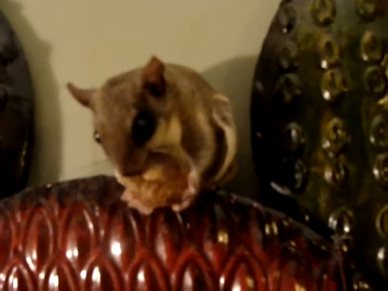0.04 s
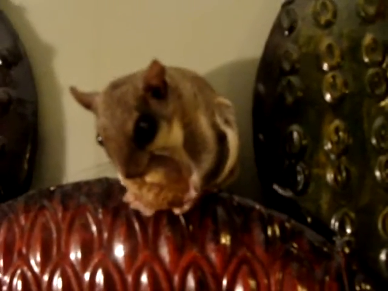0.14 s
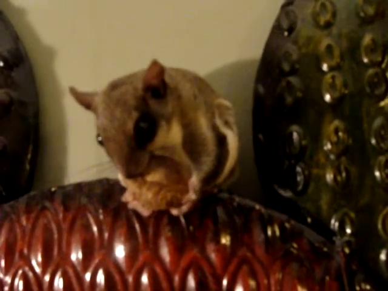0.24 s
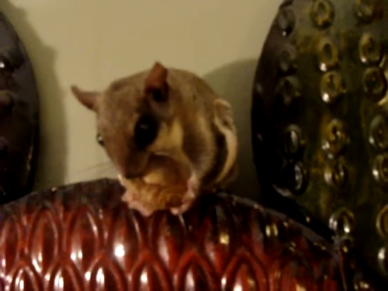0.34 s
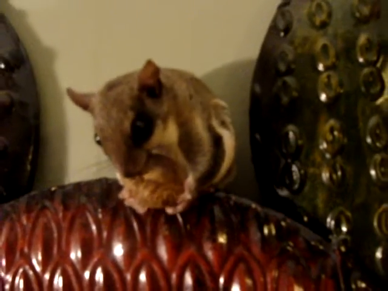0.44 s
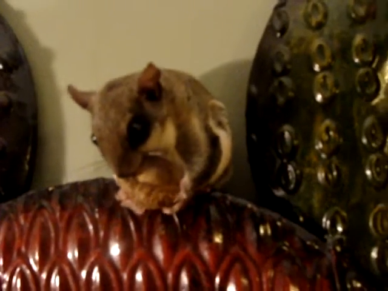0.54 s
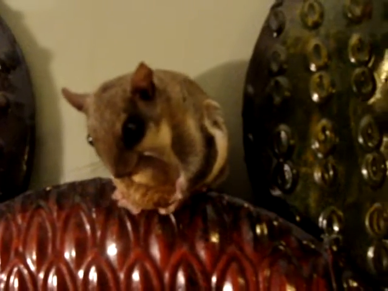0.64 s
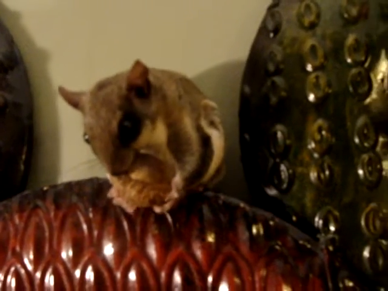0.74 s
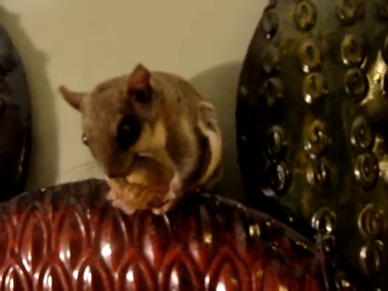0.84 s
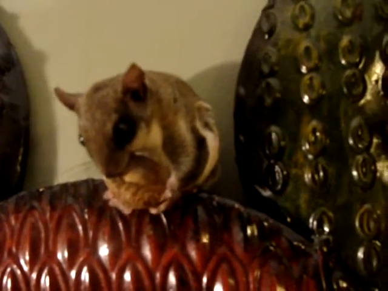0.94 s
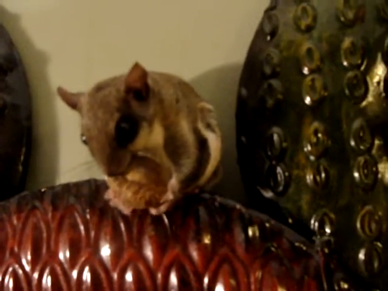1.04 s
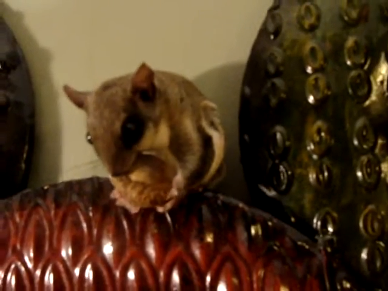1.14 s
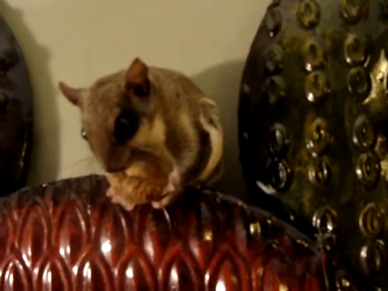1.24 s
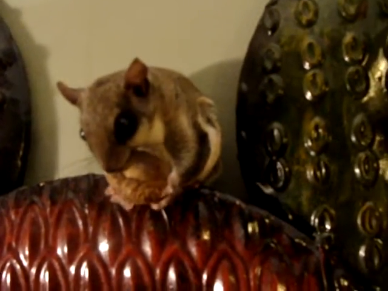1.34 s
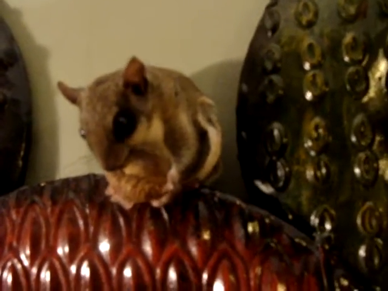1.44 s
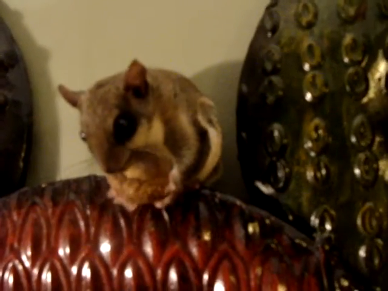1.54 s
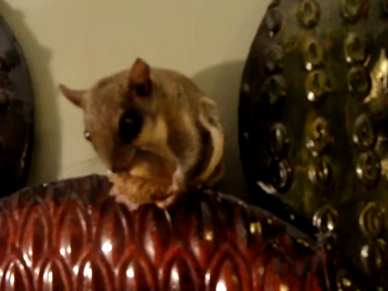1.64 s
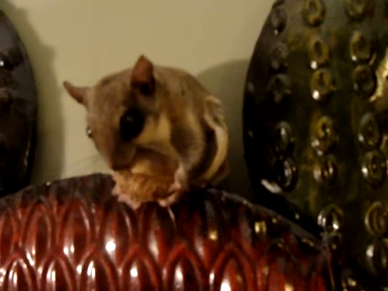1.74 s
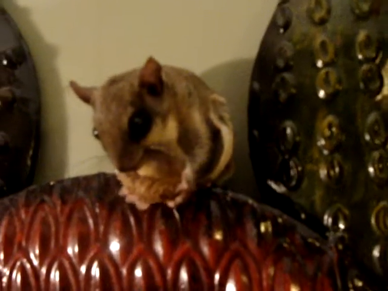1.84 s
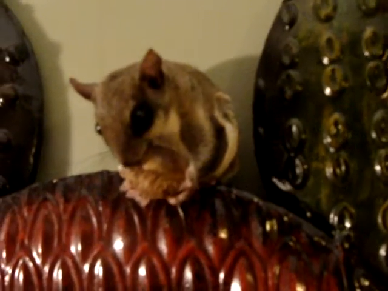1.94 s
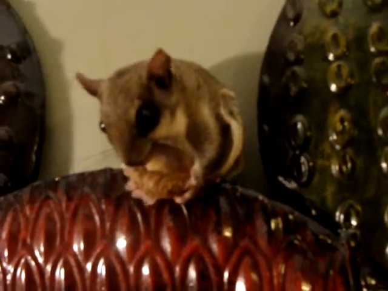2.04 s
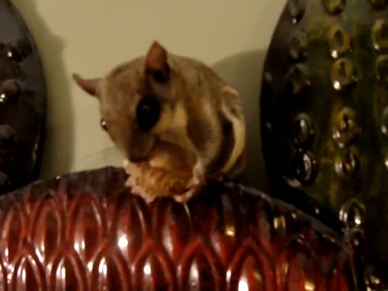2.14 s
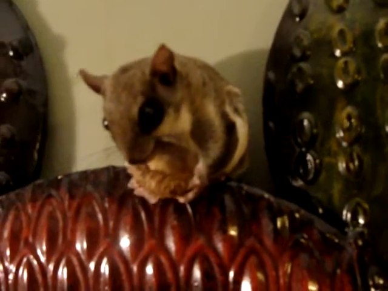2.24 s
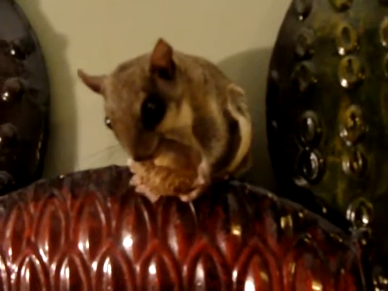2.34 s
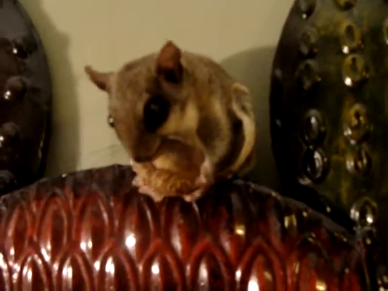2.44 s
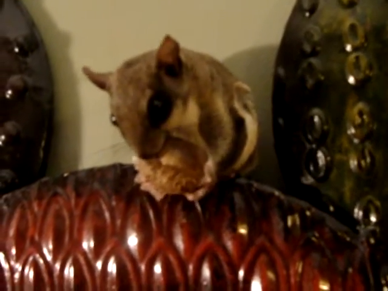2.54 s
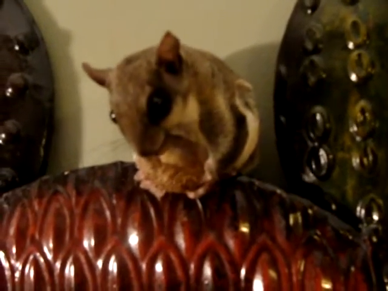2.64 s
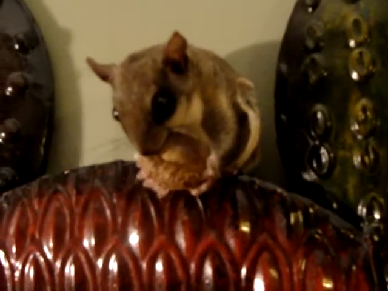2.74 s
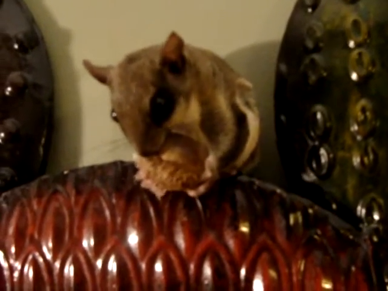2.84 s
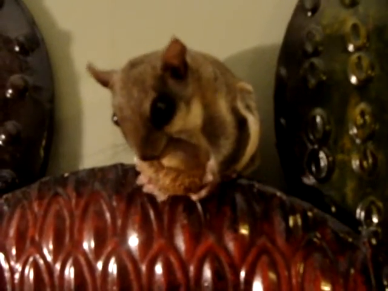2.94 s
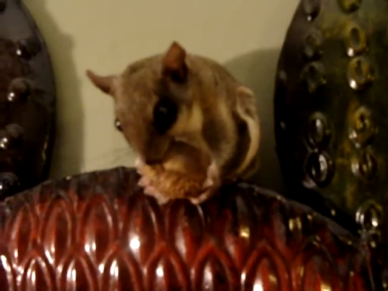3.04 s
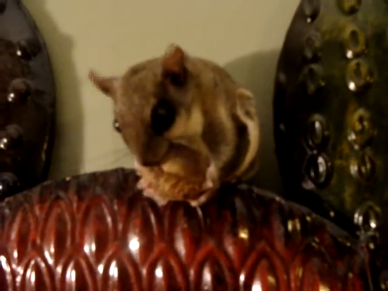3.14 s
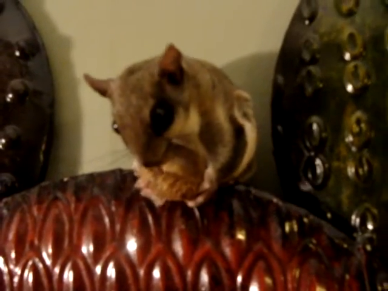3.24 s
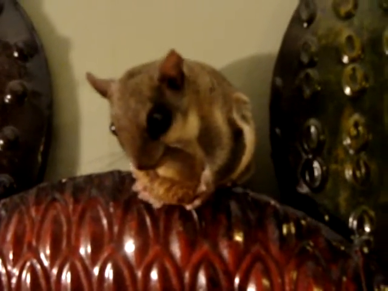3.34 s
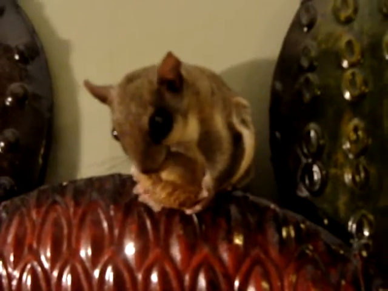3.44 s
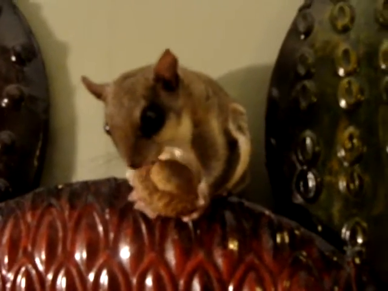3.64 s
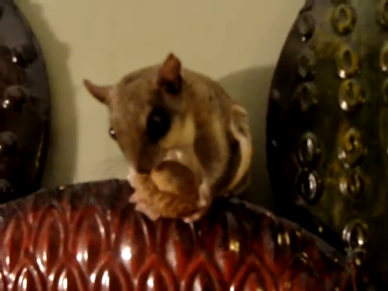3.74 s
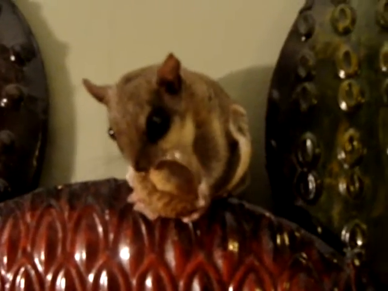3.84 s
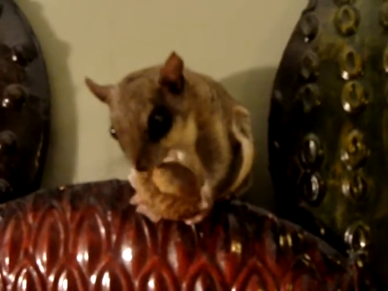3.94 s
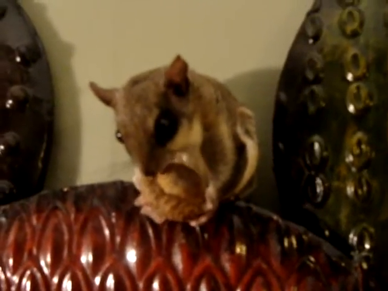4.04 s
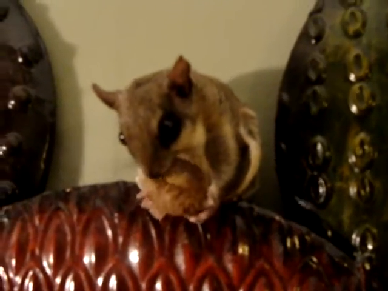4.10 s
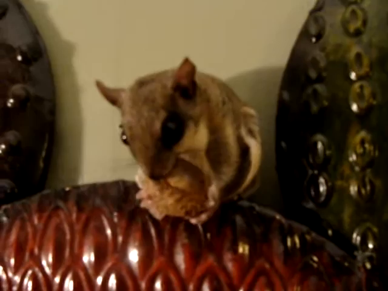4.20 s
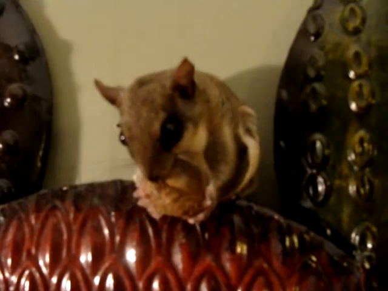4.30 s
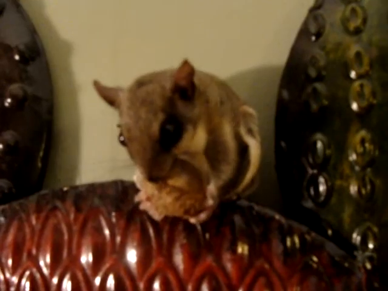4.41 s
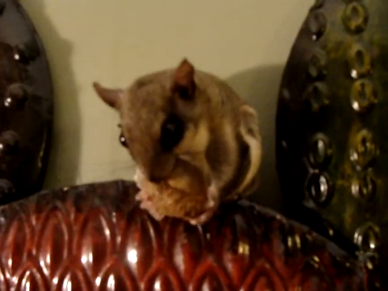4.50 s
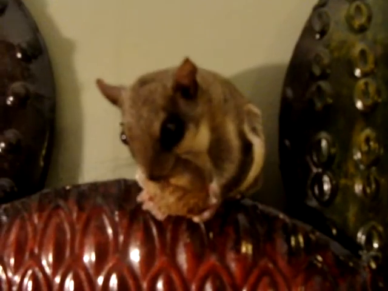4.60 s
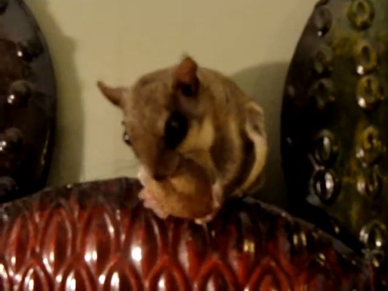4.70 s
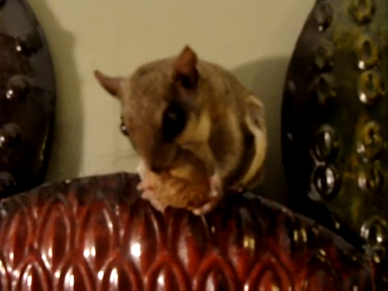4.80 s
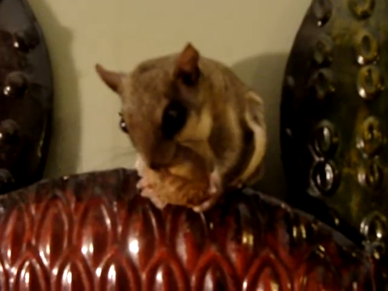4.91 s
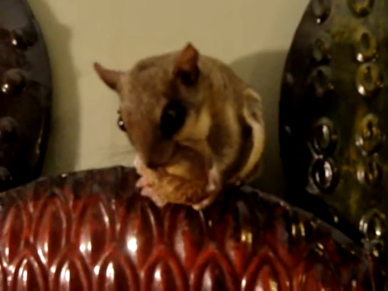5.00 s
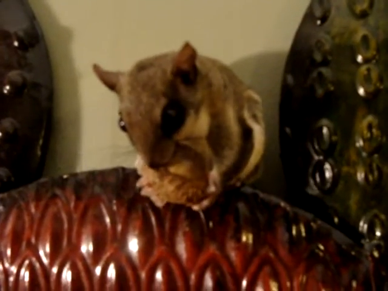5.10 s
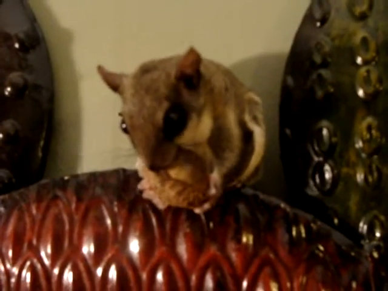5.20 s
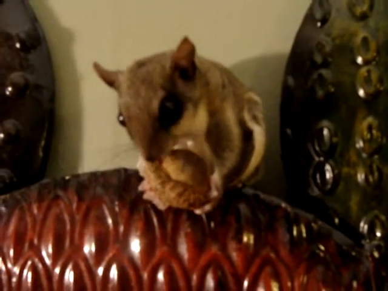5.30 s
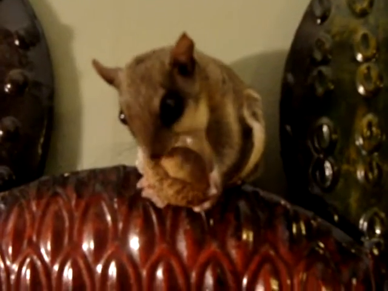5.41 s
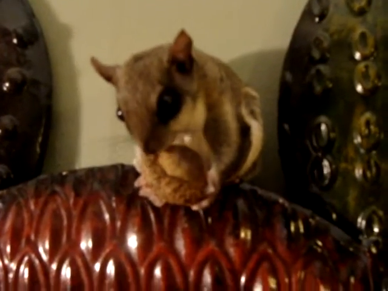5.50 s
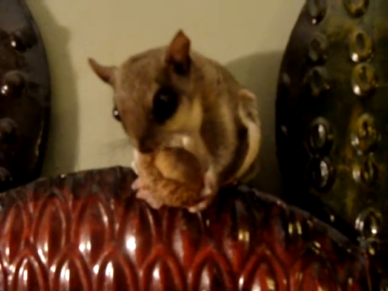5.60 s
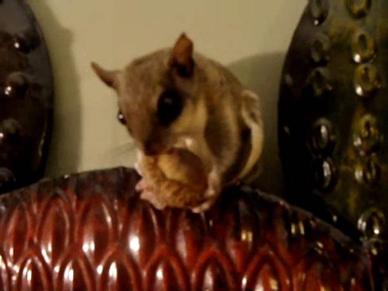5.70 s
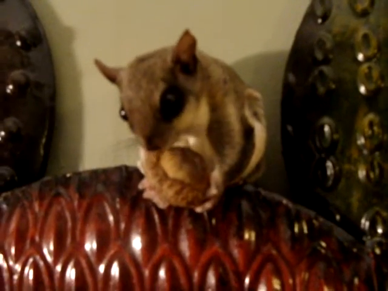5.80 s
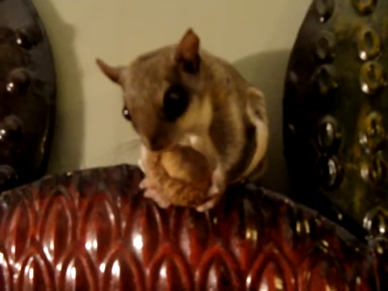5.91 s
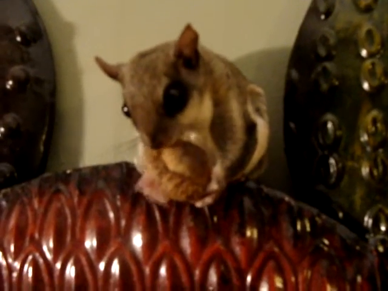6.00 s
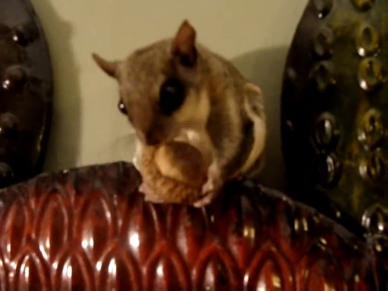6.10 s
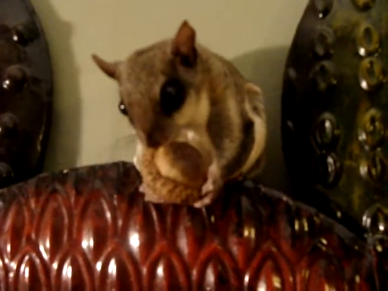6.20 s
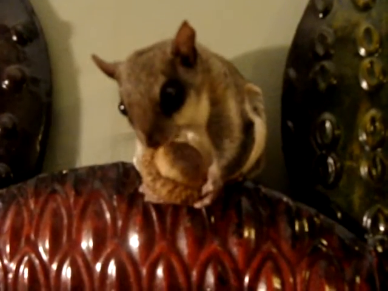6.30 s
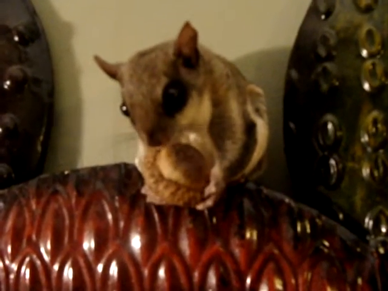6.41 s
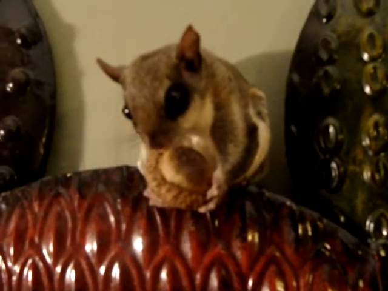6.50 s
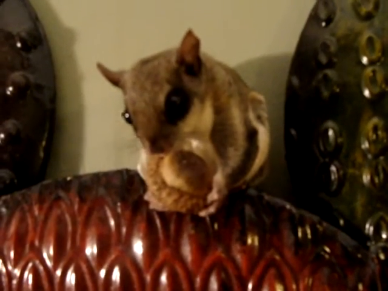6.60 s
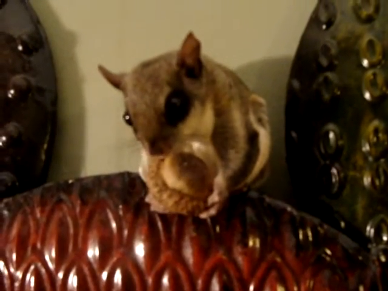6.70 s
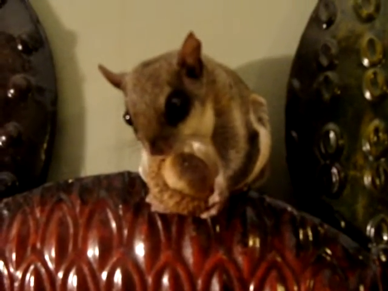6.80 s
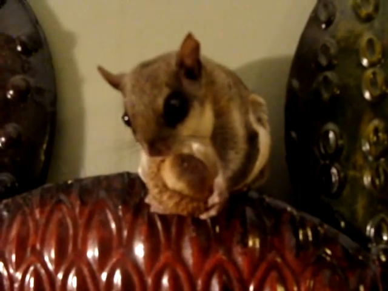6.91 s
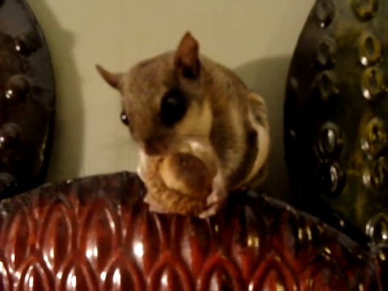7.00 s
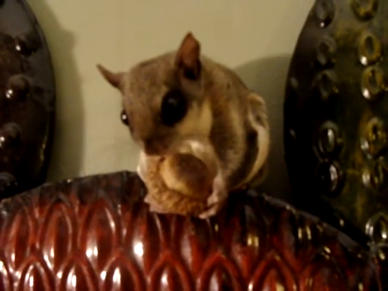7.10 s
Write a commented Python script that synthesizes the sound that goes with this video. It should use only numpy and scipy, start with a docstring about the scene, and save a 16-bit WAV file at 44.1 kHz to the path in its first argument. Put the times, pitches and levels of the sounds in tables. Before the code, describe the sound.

A small rodent gnaws a hard nut close to a small microphone in a quiet room. Sharp, brittle cracks begin at once, strong in the first 0.4 seconds with a slight low thump under two of them. Until about 3.5 seconds the clicks keep coming several a second, unevenly, some single and some in tight pairs, with a hollow woody ring and bright snap; a particularly hard one falls near 2.3. Tiny stuttering tooth scrapes and fine crackle fill in between. From 3.5 to 4.2 there is a pause, then a few weaker bites, with firmer cracks around 4.7 to 5.05. At 5.15 to 5.6 the last small cracks mix with soft knocks and rasps as the nut is turned; one faint rub comes at 6.2. Otherwise only low room drone, faint hum and gently pulsing hiss remain until about 7 seconds. Reverberation is slight.

```python
"""A flying squirrel's teeth crack an acorn on a glazed pot, close to a small microphone in a quiet room:
each crack is a run of breaks exciting the resonances of the hollow nut and its stiff shell.
Dragging teeth stick and slip in tiny fractures; random impulses crackle faintly around cracks and drags.
Near the end it stops and shifts the nut, with filtered-noise rubs that knock and rasp.
Echoes and a faint tail follow; beneath lie shaped-noise room drone and hiss, with sine hum."""
import sys
import numpy as np
from scipy import signal
from scipy.fft import rfft, irfft
from scipy.io import wavfile

SR = 44100
rng = np.random.default_rng(int(sys.argv[2]) if len(sys.argv) > 2 else 0)


def generate_wav(sig):
    """Save sig (samples, or channels by samples) to the path in sys.argv[1] as 16-bit PCM at SR."""
    pcm = np.round(np.clip(np.atleast_2d(sig).T, -1, 1) * 32767).astype(np.int16)
    wavfile.write(sys.argv[1], SR, pcm)


N = 315297

# Room air with microphone hiss, relative spectrum: f/Hz, density/dB (per Hz)
AIR_SPECTRUM = [(20, -16.5), (45, -11.5), (72, -9.5), (95, 3), (140, -2.5), (240, -4.5), (345, -0.5),
                (460, -6), (900, -9), (1800, -14), (2400, -15), (3400, -21), (7000, -26), (10000, -29.5)]
AIR_DB = -49.5  # rms
# Mains hum, steady sines: f/Hz, rms level/dB
HUM_TONES = [(59, -66), (240, -65)]
# Periodic faint swelling of the hiss: first peak t/s, period/s, Gaussian half-width/s (to 1/e)
HISS_SWELL = (.06, 1.0, .035)
# Reflections from nearby pots and wall: delay/s, level/dB
REFLECTIONS = [(.0024, -35), (.0043, -30), (.0091, -47)]
# Reverberation time of the room: f/Hz, t60/s
REVERBERATION = [(500, 1), (2500, 1), (5000, 0.41), (10000, 0.66)]
# Low push under two hard cracks: t/s, peak level before filtering/dB, decay constant/s
LOW_PUSHES = [(0.048, -30, 0.0022), (0.3745, -34.5, 0.0084)]
# The nut shifts in the paws: t/s, length scale/s, knock level/dB, rasp level/dB, rasp f/Hz
NUT_SHIFTS = [(5.184, 0.02, -56, -50, 2300), (5.215, 0.018, -44, -50, 2300), (5.226, 0.028, -50, -46, 2200),
              (5.242, .014, -60, -47.5, 2720), (5.426, 0.012, -38, -44, 2600),
              (5.591, 0.021, -55, -50, 1740), (6.224, 0.01, -66, -48.5, 2700)]
# Teeth drag over the shell: start t/s, length/s, rms level before the overall drag gain/dB
TOOTH_DRAGS = [(0.188, 0.012, -44), (0.29, 0.04, -45.5), (0.484, 0.042, -46.5), (0.551, 0.0077, -47),
               (0.669, 0.016, -43), (0.796, 0.0095, -50), (0.827, 0.019, -41), (0.959, 0.029, -48.5),
               (1.119, 0.021, -44.5), (1.5, 0.015, -43.5), (1.636, 0.048, -48.5), (1.812, 0.0062, -46.5),
               (2.274, 0.009, -37), (2.366, 0.007, -47.5), (2.573, 0.012, -40.0), (2.6, 0.006, -51),
               (2.707, 0.026, -50.5), (2.757, 0.011, -44), (2.902, 0.024, -48), (3.048, 0.0084, -44.5),
               (3.104, 0.011, -44.0), (3.259, 0.027, -45.5), (3.46, 0.011, -46.0), (3.521, 0.0063, -47),
               (4.145, 0.016, -47.5), (4.719, 0.0065, -37.5), (4.892, 0.01, -45), (5.042, 0.006, -37),
               (5.192, 0.0084, -43)]
# The shell gives way: t/s, energy level before the overall gnawing gain/dB,
# hollow ring over shell crack and snap together/dB, ring f/Hz, nominal shell f/Hz,
# energy ratio of each after-crack to the one before (0-1, limited in use)
SHELL_CRACKS = [(0.0108, -35.5, 2, 2950, 4320, 0.15), (0.0437, -20.5, 0, 2920, 4850, 0.3),
                (0.0485, -20, -5.5, 2530, 5200, 0.57), (0.161, -25, 1, 2530, 4530, 0.84),
                (0.1984, -23.5, -4, 2440, 5360, 0.7), (0.331, -36, 1.5, 2160, 5550, 0.1),
                (0.3754, -21, -5, 2510, 4890, 0.1), (0.5048, -34.5, 6, 2400, 3530, 0.1),
                (0.5155, -32.5, -1, 2270, 5180, 0.1), (0.5607, -26.5, -6, 2640, 5100, 0),
                (0.651, -29.1, 1, 2470, 4200, 0.06), (0.672, -33.5, 2, 2280, 5240, 0.1),
                (0.6795, -35, -9, 2430, 5490, 0), (0.6847, -32.3, -7, 2920, 5700, 0),
                (0.801, -37, 4, 2670, 4490, 0.45), (0.8328, -28.5, -2, 2650, 5350, 0.35),
                (0.858, -33.5, -1.5, 2270, 4080, 0), (0.9542, -32.5, 1, 2360, 4360, 0.39),
                (0.984, -30.6, -0.5, 2570, 4570, 0.3), (1.0115, -24, -6, 2340, 5200, 0.02),
                (1.1263, -29.5, 5.5, 2590, 4900, 0.1), (1.2135, -23.5, -6.5, 2530, 4600, 0.11),
                (1.3227, -35.5, 1, 2470, 4510, 0.32), (1.5061, -35.5, 3, 2710, 5100, 0.1),
                (1.5364, -26, -8.5, 2620, 4860, 0.08), (1.665, -40, 1, 2590, 5340, 0.02),
                (1.7206, -24.5, -3.5, 2440, 4400, 0.06), (1.8404, -35.5, 2, 2800, 4290, 0.15),
                (1.8817, -22.5, -5, 2760, 5170, 0.2), (2.002, -37.5, -2, 2360, 5150, 0),
                (2.0215, -31.8, -3, 2470, 5000, 0.4), (2.0626, -22, -4.5, 2150, 5600, 0.25),
                (2.1844, -30, 8, 2780, 3570, 0), (2.215, -35.9, -3, 2430, 5860, 0.07),
                (2.2711, -17, -4, 2400, 5000, 0.14), (2.399, -39, 2, 2530, 4420, 0),
                (2.461, -25, -4.5, 2560, 5270, 0.35), (2.5708, -28, 5, 2920, 4170, 0.18),
                (2.769, -29.5, -2.5, 2270, 4550, 0.11), (2.8829, -36, -3.5, 2450, 3990, 0.06),
                (2.9427, -23.5, -6.5, 2420, 4200, 0.05), (2.9546, -35.5, -8, 1970, 5460, 0),
                (3.066, -36, 4, 2880, 3840, 0), (3.112, -40, -5, 2620, 4690, 0.02),
                (3.1445, -22, 1, 2300, 4760, 0.21), (3.2708, -30.8, 10, 2700, 3600, 0),
                (3.2952, -37.0, 3, 2820, 4330, 0), (3.3332, -27.5, -2, 2840, 4900, 0.05),
                (3.355, -27.5, -1, 2660, 5100, 0), (3.5061, -26.5, -7.5, 2260, 4770, 0.46),
                (4.1756, -35, -5, 2070, 4650, 0.57), (4.307, -44, -10, 2150, 4420, 0.13),
                (4.7144, -28, 2, 2120, 4150, 0.12), (4.889, -26.5, -2.5, 2220, 4300, 0.19),
                (4.996, -39, 1, 2340, 4320, 0.16), (5.039, -20, -7.5, 2220, 4480, 0.04),
                (5.157, -37.1, 6, 3050, 3430, 0.03), (5.1659, -29.5, -3, 2670, 4340, 0.23),
                (5.1738, -35.5, 1, 2180, 4880, 0), (5.213, -38.5, -2, 1980, 5290, 0.4)]

AFTER_GAP_S, AFTER_JITTER = 0.0033, 0.15  # nominal spacing of after-cracks; jitter as a share of it
SHELL_SPREAD = 0.052  # log-frequency spread: the stiff shell rings differently at every spot
# Bright snap over shell crack at the usual level; harder bites are duller.
SNAP_DB, SNAP_PER_DB, USUAL_DB = 1, -0.16, -25
COLOUR_SPREAD_DB = 0.5  # random spread of the snap
SLIP_GAP_S, SLIP_SPREAD_DB = 0.0048, 4.0  # nominal spacing of slips and spread of their levels
SLIP_RING_HZ, SLIP_SHELL_HZ, SLIP_HOLLOW_DB = 2620, 4750, -0.5  # nominal frequencies
SLIP_CRUMBLE, SLIP_CRUMBLE_S = 0.57, 0.0012  # energy share and decay of the crumbling
EDGE_HZ = 10100  # recorder's upper band limit


def amp(db):
    """Decibel law: level to amplitude ratio."""
    return 10 ** (np.asarray(db) / 20)


def unit(x):
    """Normalization: scales a sound to rms 1."""
    return x / np.sqrt(np.mean(x ** 2) + 1e-20)


def read(points, hz):
    """Interpolation: joins rows (f/Hz, value) by lines on a log-frequency axis."""
    f, value = np.transpose(points)
    return np.interp(np.log(hz + 1), np.log(f), value)


def add(mix, s, sound):
    """Superposition: adds a sound to the mix in place, from time s."""
    part = mix[max(round(s * SR), 0):][:len(sound)]
    part += sound[:len(part)]


def noise(points, size):
    """Spectral shaping: white noise weighted to the given spectrum, at rms 1."""
    gain = amp(read(points, np.fft.rfftfreq(size, 1 / SR)))
    white = rfft(rng.standard_normal(size))
    return unit(irfft(white * gain, size))


def resonate(x, hz, width_hz):
    """Resonance: one damped mode of the given bandwidth."""
    return signal.lfilter(*signal.iirpeak(hz, hz / width_hz, SR), x)


def band(x, low_hz, high_hz, order=2):
    """Band limiting: a causal band-pass."""
    edges = [low_hz, min(high_hz, SR / 2 - 1)]
    return signal.lfilter(*signal.butter(order, edges, "band", fs=SR), x)


def background(swell_db=-59):
    """Superposition of stationary noise, mains-hum sines and amplitude-modulated hiss."""
    t = np.arange(N) / SR
    hum = np.zeros(N)
    for hz, db in HUM_TONES:
        hum += amp(db) * np.sqrt(2) * np.sin(2 * np.pi * (hz * t + rng.random()))
    first, period, width = HISS_SWELL
    from_peak = (t - first + period / 2) % period - period / 2
    swell = np.exp(-(from_peak / width) ** 2)
    hiss = unit(band(rng.standard_normal(N), 4200, 7500))
    return amp(AIR_DB) * noise(AIR_SPECTRUM, N) + hum + amp(swell_db) * swell * hiss


def tail(wet_db, start_s):
    """Diffuse reverberation: noise decays at a rate set by t60, the treble faster than the lows."""
    response = np.zeros(SR // 2)
    hz, t, frames = signal.stft(rng.standard_normal(SR // 2), SR, nperseg=256)
    fading = amp(-60 * t / read(REVERBERATION, hz)[:, None])
    decay = signal.istft(frames * fading, SR, nperseg=256)[1]
    add(response, start_s, amp(wet_db) * decay / np.linalg.norm(decay))
    return response


def room(x, wet_db=-19, start_s=0.007, count=3):
    """Reflection and reverberation: close echoes, then a faint tail varying as the head moves."""
    out = x.copy()
    for delay, db in REFLECTIONS:
        add(out, delay, amp(db) * x)
    turn = 2 * np.pi * np.arange(N) / SR  # one cycle of head movement a second
    for k in range(count):
        facing = np.sqrt(2 / count) * np.cos(turn + np.pi * k / count)
        out += signal.fftconvolve(x * facing, tail(wet_db, start_s))[:N]
    return out


def pushes(size=4096):
    """Exponential relaxation: one-sided pulses, band-limited to a brief low thud."""
    out, t = np.zeros(N), np.arange(size) / SR
    for s, db, decay in LOW_PUSHES:
        add(out, s, amp(db) * np.exp(-t / decay))
    return band(out, 6, 700, order=1)


def handling(knock_hz=800, knock_width_hz=320, rasp_width_hz=560):
    """Frictional excitation: short rubs of the nut stir a dull resonance and a higher rasp."""
    out = np.zeros(N)
    for s, length, knock_db, rasp_db, rasp_hz in NUT_SHIFTS:
        u = np.arange(int(3 * length * SR)) / (length * SR / 4)
        swell = u * np.exp(1 - u)  # fast rise, slower decay
        rub = swell * rng.standard_normal(len(u))
        knock = band(resonate(rub, knock_hz, knock_width_hz), 450, 1150)
        rasp = resonate(rub, rasp_hz, rasp_width_hz)
        rasp = resonate(rasp, rasp_hz, rasp_width_hz)
        level = np.sqrt(np.mean(swell ** 2))
        add(out, s, level * (amp(knock_db) * unit(knock) + amp(rasp_db) * unit(rasp)))
    return out


def crackling(level_db=-56.0, near_per_s=3000, near_reach_s=0.0055, drag_per_s=500,
              far_per_s=70, far_reach_s=0.013):
    """Random impulses: faint crackle swells and fades around each crack and runs along each drag."""
    rate, size = np.zeros(N), np.ones(N)
    near = np.hanning(int(2 * near_reach_s * SR))
    far = np.hanning(int(2 * far_reach_s * SR))
    for s, *_ in SHELL_CRACKS:
        # both swells are centred on the crack
        add(rate, s - near_reach_s, near_per_s * near)
        add(size, s - near_reach_s, near)
        add(rate, s - far_reach_s, far_per_s * far)
    for start, length, _ in TOOTH_DRAGS:
        add(rate, start, np.full(int(length * SR), drag_per_s))
    occurs = rng.random(N) < rate / SR
    impulses = size * rng.standard_normal(N) * occurs
    coloured = resonate(impulses, 2500, 1200) + band(impulses, 6060, 8560)
    return amp(level_db) * unit(coloured)


def causal(gain):
    """Minimum phase: cepstral folding gives the tightest causal click with the given gains."""
    cepstrum = irfft(np.log(np.maximum(gain, gain.max() * 1e-4)))
    half = len(cepstrum) // 2
    cepstrum[1:half] *= 2
    cepstrum[half + 1:] = 0
    return np.exp(rfft(cepstrum))


def fracture(ring_db, ring_hz, crack_db, crack_hz, snap_db, crumble, crumble_s,
             ring_width_hz=850, crack_width_hz=1450, snap_hz=7500, snap_width_hz=2500,
             knock_db=-13, knock_ratio=0.55, knock_width_hz=1100, size=1024):
    """Impulsive excitation of modes: a sharp break and smaller ones ring the nut and its shell."""
    t, hz = np.arange(size) / SR, np.fft.rfftfreq(size, 1 / SR)
    crumbs = rng.standard_normal(size) ** 3 * np.exp(-t / crumble_s)  # cubing makes them spiky
    share = np.clip(crumble, 0.02, 0.95)
    force = np.sqrt(1 - share) + np.sqrt(share) * rfft(crumbs) / np.linalg.norm(crumbs)
    recoil_db = (ring_db + crack_db) / 2 + knock_db
    resonances = [(recoil_db, knock_ratio * ring_hz, knock_width_hz),  # the whole nut recoils
                  (ring_db, ring_hz, ring_width_hz),
                  (crack_db, crack_hz, crack_width_hz),
                  (snap_db, snap_hz * rng.uniform(0.91, 1.067), snap_width_hz)]
    power = np.zeros(len(hz))
    for db, centre, width in resonances:
        peak = (1 + ((hz - centre) / width) ** 2) ** -3
        power += amp(db) ** 2 * peak / np.mean(peak * abs(force) ** 2)
    return irfft(force * causal(np.sqrt(power * size)))


def chip(level_db, hollow_db, ring_hz, shell_hz, crumble, crumble_s):
    """Energy partition: one fracture is shared among hollow ring, shell crack and bright snap."""
    spot, tint = np.clip(rng.standard_normal(2), -2, 2)
    hardness_db = np.clip(level_db - USUAL_DB, -10, 10)
    snap = amp(SNAP_DB + SNAP_PER_DB * hardness_db + COLOUR_SPREAD_DB * tint)
    parts = np.array([amp(hollow_db) * np.hypot(1, snap), 1, snap])
    ring_db, crack_db, snap_db = level_db + 20 * np.log10(parts / np.linalg.norm(parts))
    crack_hz = shell_hz * np.exp(SHELL_SPREAD * spot)
    return fracture(ring_db, ring_hz, crack_db, crack_hz, snap_db, crumble, crumble_s)


def slipping(level_db=1.0, slip_db=-42, gap_jitter=0.45, ring_spread=0.16, count=16):
    """Stick-slip friction: a drag of the teeth is an uneven run of tiny fractures."""
    out, step = np.zeros(N), np.arange(count)
    for start, length, db in TOOTH_DRAGS:
        run = np.zeros(SR // 4)
        gaps, spots = rng.uniform(-1, 1, (2, count))
        delays = SLIP_GAP_S * (step + gap_jitter * gaps * (step > 0))
        for delay, spot, force in zip(delays, spots, rng.standard_normal(count)):
            tuning = 1 + ring_spread * spot
            # slip_db sets the snap's brightness; the run's level is set below
            slip = chip(slip_db + SLIP_SPREAD_DB * force, SLIP_HOLLOW_DB, SLIP_RING_HZ * tuning,
                        SLIP_SHELL_HZ * tuning, SLIP_CRUMBLE, SLIP_CRUMBLE_S)
            add(run, delay, slip * (delay < length))  # no slips begin after the drag ends
        add(out, start, amp(db) * np.sqrt(length * SR) * run / np.linalg.norm(run))
    return amp(level_db) * out


def gnawing(level_db=-8.0, first_crumble=0.4, first_crumble_s=0.0013, after_crumble=0.37,
            after_crumble_s=0.0015, after_hollow_db=-1.5, count=3):
    """Brittle fracture in steps: each break passes a share of its energy on to the next."""
    out, step = np.zeros(N), np.arange(count)
    for s, db, hollow_db, ring_hz, shell_hz, passed_on in SHELL_CRACKS:
        energy = np.clip(passed_on, 0.005, 0.95) ** step
        step_db = db + 10 * np.log10(energy / energy.sum())
        delay = AFTER_GAP_S * (step + AFTER_JITTER * rng.uniform(-1, 1, count))
        first = chip(step_db[0], hollow_db, ring_hz, shell_hz, first_crumble, first_crumble_s)
        add(out, s, first)
        for k in step[1:]:
            after = chip(step_db[k], hollow_db + after_hollow_db, ring_hz, shell_hz,
                         after_crumble, after_crumble_s)
            add(out, s + delay[k], after)
    return amp(level_db) * out


def scene():
    """Superposition: the nut's sounds pass through the room; pushes and background are added."""
    nut = gnawing() + slipping() + crackling() + handling()
    return (room(nut) + pushes() + background())[None]


def record(dry, ceiling=0.79):
    """Saturation and band limiting: the microphone rounds peaks, the recorder cuts the treble."""
    rounded = ceiling * np.tanh(dry / ceiling)
    lowpass = signal.firwin(511, EDGE_HZ, window=("kaiser", 8), fs=SR)
    return signal.oaconvolve(rounded, lowpass[None], "same")


dry = scene()
out = record(dry)
generate_wav(out)
```